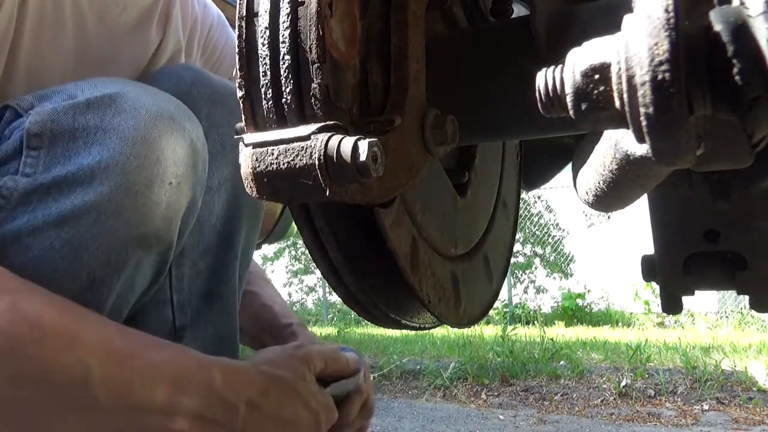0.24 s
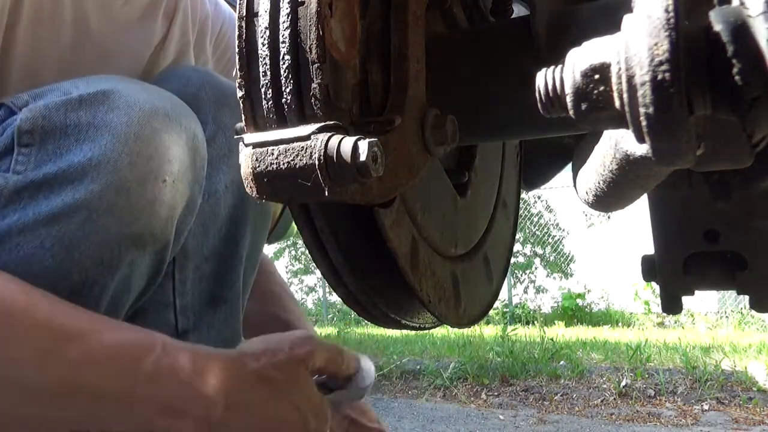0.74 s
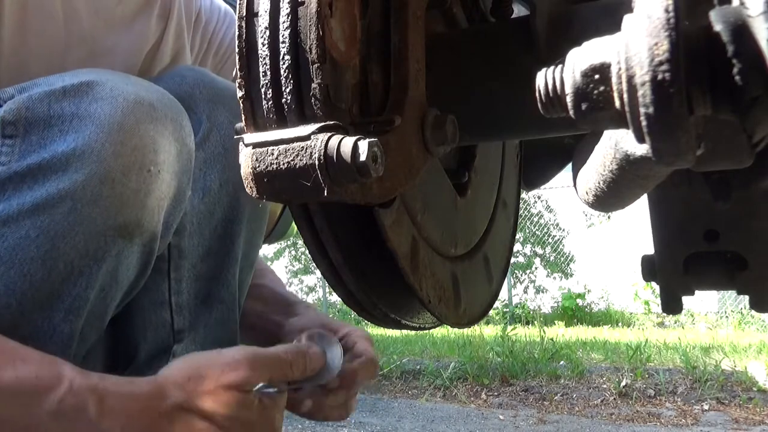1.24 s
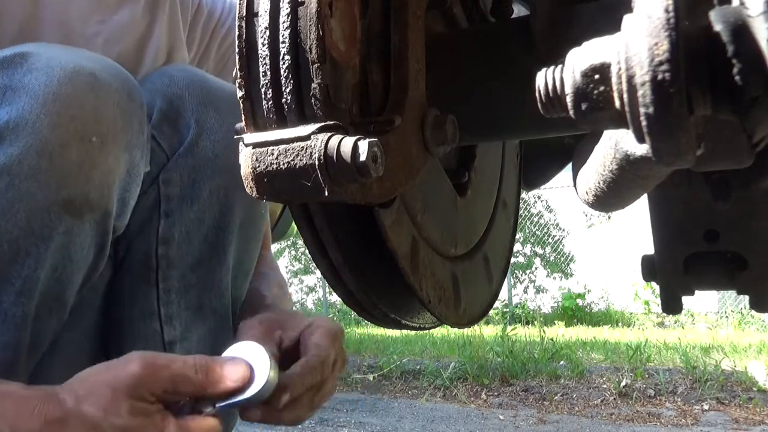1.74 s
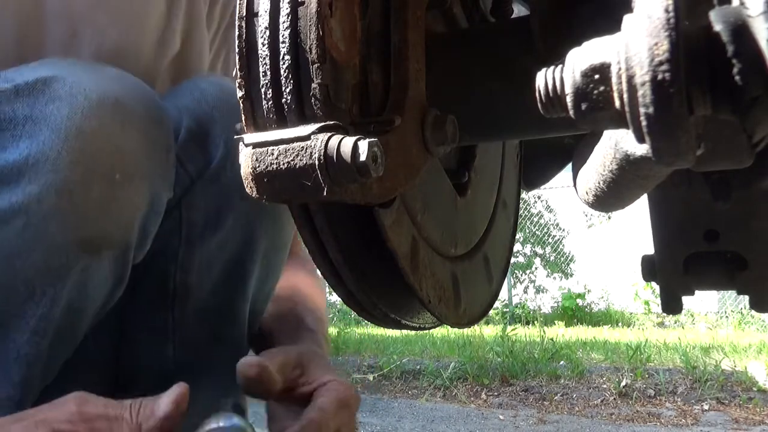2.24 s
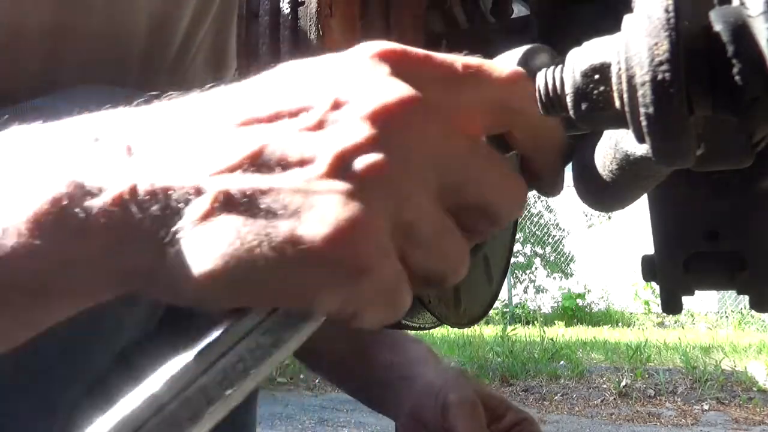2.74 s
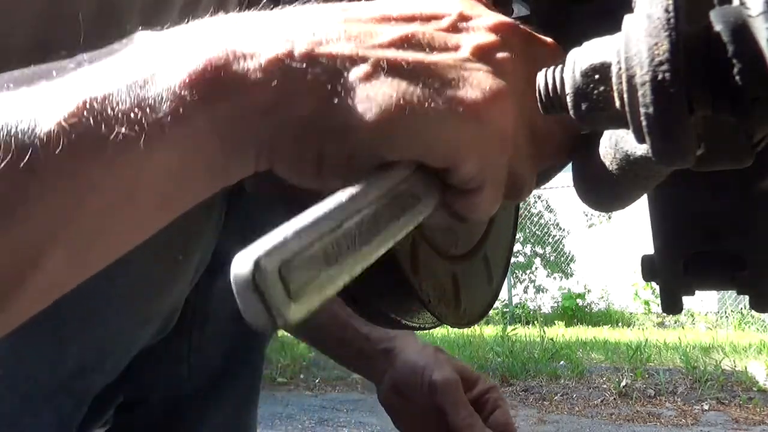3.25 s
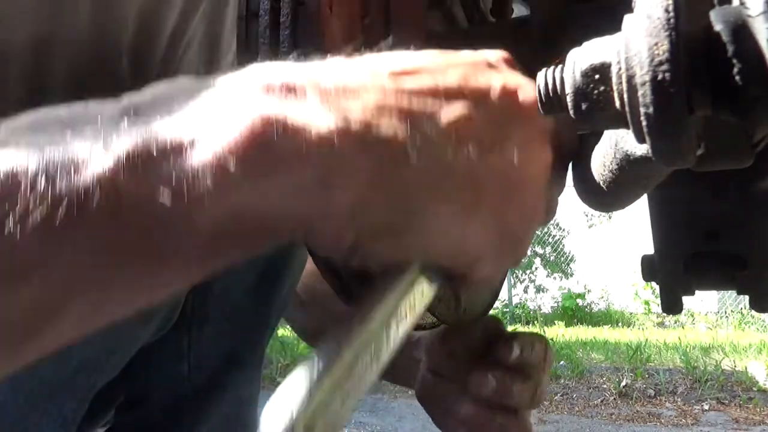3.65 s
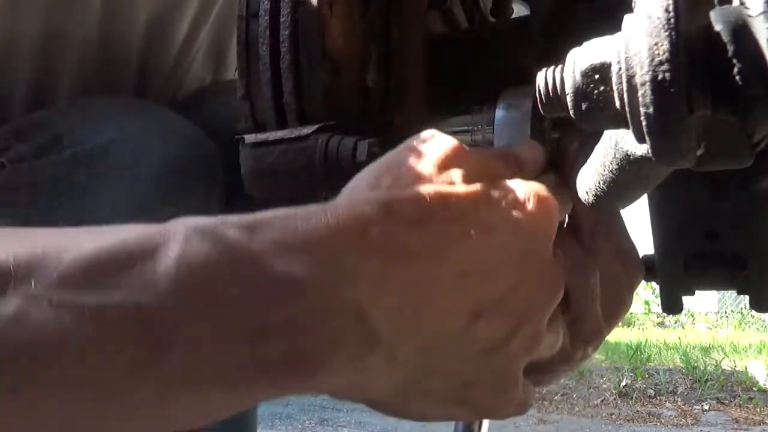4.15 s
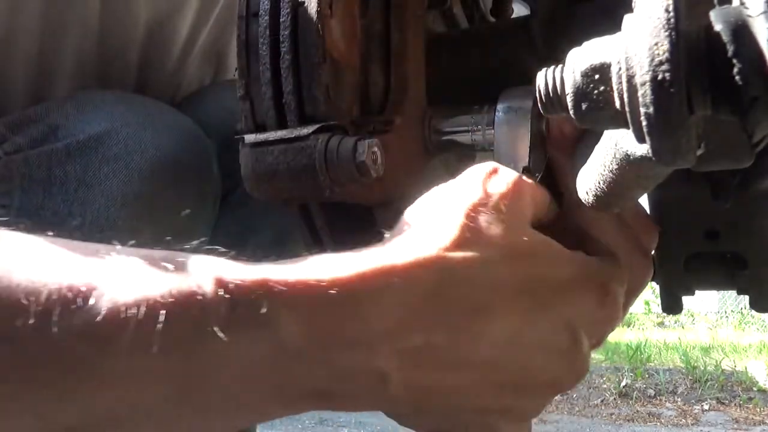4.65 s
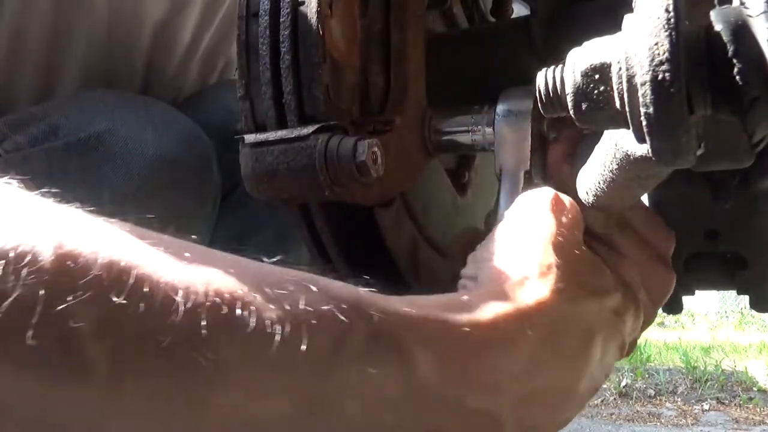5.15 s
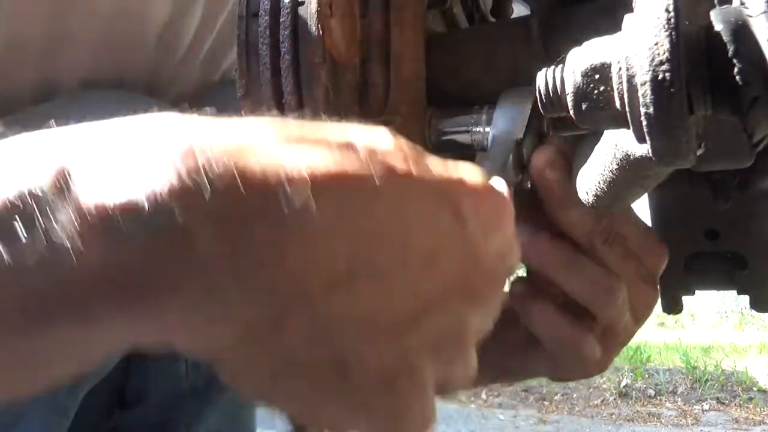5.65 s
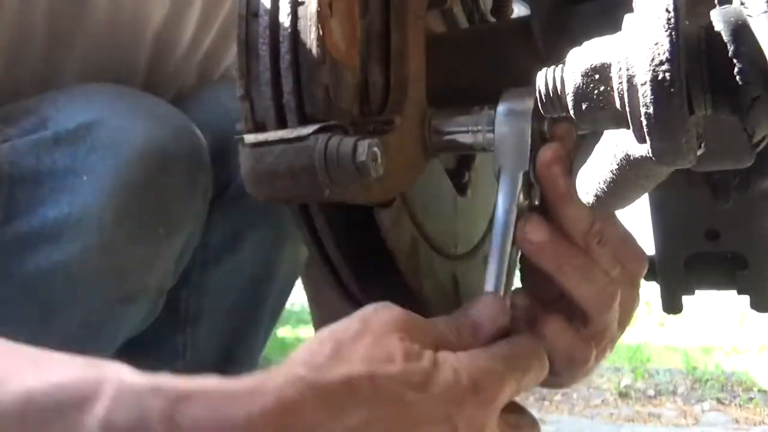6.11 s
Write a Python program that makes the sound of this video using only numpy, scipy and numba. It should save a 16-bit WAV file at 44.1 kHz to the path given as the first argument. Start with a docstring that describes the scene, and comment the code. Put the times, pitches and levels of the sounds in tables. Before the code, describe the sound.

Metal hand tools clink, thud and rattle as a ratchet is fitted and swung outdoors, with soft traffic humming behind.

```python
"""Soft traffic and a distant six-cylinder engine pulling away run throughout; hands and cloth rustle.
A steel socket rings faintly, then it and a ratchet knock and drag on concrete as they are picked up
(0.9-1.9 s) and clicked together. One bird whistles three falling calls (1.6-2.2 s), a second a lower
phrase (2.3-3.2 s). The socket seats on a hub bolt with clinks and dull thuds (3.2-3.9 s); the ratchet
is swung, teeth and loose parts rattling (5.5-6.2 s). A limiter ducks the loudest blows."""
import sys
import numpy as np
from scipy import signal
from scipy.fft import rfft, irfft, next_fast_len
from scipy.io import wavfile
from scipy.ndimage import map_coordinates
from numba import njit

SR = 44100
rng = np.random.default_rng(int(sys.argv[2]) if len(sys.argv) > 2 else 0)


def transcribe(u):
    """Save the signal u as a 16-bit wav file named by the first command-line argument.

    u: samples, shape (n,) or (channels, n), limited to [-1, 1]; the rate is SR.
    q: integer samples, one column per channel.
    """
    v = np.clip(np.atleast_2d(u).T, -1, 1)
    q = np.round(v * 32767).astype(np.int16)
    wavfile.write(sys.argv[1], SR, q)


N = 281358
T = np.arange(N) / SR
APART = np.array([[1], [-1]])  # left +, right -

# Modes of a tool lying on concrete. Each row: frequency in Hz, width in Hz, level in dB.
GROUNDED_MODES = [(1252, 200, 24), (1510, 89, 13.5), (1785, 27, 9.5), (2100, 33, 2), (2800, 350, -2.5),
                  (3830, 690, -8), (4070, 250, -2.5), (5200, 200, -30), (5830, 610, -4), (7120, 240, -0.5)]
# Modes of the ratchet. Same columns.
RATCHET_MODES = [(600, 60, -14), (950, 200, -9), (1430, 90, -10), (1720, 70, -14), (1850, 50, -14),
                 (2000, 30, -4), (2118, 38, -3), (2660, 130, -6), (3030, 100, -9), (3250, 60, -11),
                 (3470, 90, -7), (3900, 300, -10), (4300, 250, -7), (4700, 120, -10), (5110, 150, -12),
                 (5700, 400, -12), (6700, 250, -6), (7100, 350, -4), (7840, 200, -8), (8400, 300, -11),
                 (9210, 250, -11), (9690, 200, -12), (10200, 200, -13), (10900, 200, -9), (12300, 500, -22),
                 (12950, 200, -25), (14200, 600, -34)]


def undb(db):
    return 10 ** (np.asarray(db) / 20)


def level(x, rms_db):
    return x * undb(rms_db) / np.sqrt(np.mean(x ** 2))


def decay(t, t60_s):
    return np.exp(-np.log(1000) * t / t60_s)


def band(x, lo_hz, hi_hz, order=2):
    return signal.sosfilt(signal.butter(order, (lo_hz, hi_hz), "bandpass", fs=SR, output="sos"), x)


def pan(x, left_db):
    return x * undb(APART * left_db / 2)


def interp_log_hz(hz, table):
    points_hz, values = np.transpose(table)
    return np.interp(np.log(hz), np.log(points_hz), values)


def curves(table):
    """One curve over T per column after the time column."""
    times_s, *columns = np.transpose(table)
    return [np.interp(T, times_s, column) for column in columns]


def walk(rate_hz):
    """Random points joined by lines; rms about 1.5."""
    return 1.88 * map_coordinates(rng.standard_normal(int(T[-1] * rate_hz) + 2), [T * rate_hz], order=1)


def swells(rows, rise_db_s, fall_db_s):
    """Gain of bouts that rise, hold and fall, linear in dB."""
    return sum(undb(db - rise_db_s * np.maximum(s - T, 0) - fall_db_s * np.maximum(T - s - hold_s, 0))
               for s, db, hold_s in rows)


def traffic():
    """Road noise: half-octave bands flicker separately and share a swell, the treble only slightly."""
    # Each row: time in seconds, relative level in dB.
    swell = [(0.0, -42), (0.28, -41), (0.98, -37.5), (1.67, -35.5), (2.24, -35.5), (3.91, -33.5),
             (4.46, -37), (5.79, -35.5), (6.38, -38.5)]
    # Each row: frequency in Hz, relative density in dB.
    spectrum = [(25, -30), (45, -12), (145, -5), (270, -8), (363, -15.5), (463, -23.5), (560, -19),
                (850, -18.5), (1290, -21.5), (2200, -29.5), (4200, -36.5), (6500, -42.5), (11000, -49),
                (16000, -58)]
    # Each row: frequency in Hz, left-right correlation.
    correlation = [(25, 0.79), (130, 1), (300, 0.58), (600, 0.45), (2000, 0.67), (8000, 1)]
    out, swell_db = 0, curves(swell)[0]
    for hz in 30 * 2 ** np.arange(0, 9.2, .5):
        mid, side = band(rng.standard_normal((2, N)), hz / 2 ** 0.34, min(hz * 2 ** 0.34, 17000))
        alike = np.clip(interp_log_hz(hz, correlation), 0, .99)
        noise = np.sqrt(1 + alike) * mid + np.sqrt(1 - alike) * side * APART
        follow = .8 if hz < 3000 else .2
        db = interp_log_hz(hz, spectrum) + follow * (swell_db - swell_db[0]) + 0.5 * walk(7)
        out = out + pan(undb(db) * noise, -3.5 if hz < 90 else 0)
    return level(out, -32.5)


def engine(valley_db=-16):
    """Orders of the four-stroke cycle; air and echoes make each waver."""
    # Speed, dipping at a gear change. Each row: time in seconds, cycle rate in Hz.
    speed = [(0.0, 11.5), (0.25, 11.5), (0.5, 11.72), (2.55, 12.82), (2.75, 12.42), (4.1, 13.16),
             (6.38, 14.0)]
    # Swells per clear order. Each row: peak time in seconds, level in dB, hold in seconds.
    clear_orders = {6: [(0.1, -34, 0.087), (0.7, -31.5, 0.7), (2.4, -27, 0.79), (4.0, -31.5, 0.47),
                    (4.8, -35.5, 0.18), (5.7, -36.5, 0.55)], 9: [(0.6, -30, 0.16), (1.3, -28.5, 0.37),
                    (2.2, -35, 0.32), (2.8, -37.5, 0.37), (3.75, -39, 0.058), (4.7, -41, 0.18),
                    (5.4, -55, .9)], 12: [(0.0, -32, 0.075), (0.4, -33, 0.43), (1.0, -28.5, 0.25),
                    (1.6, -20, 0.13), (2.2, -24.5, 0.16), (2.8, -17.5, 0.089), (3.45, -26.5, 0.14),
                    (4.0, -32, 0.34), (4.8, -30, 0.055), (5.2, -36, 0.26), (5.8, -47.5, 0.65)],
                    15: [(0.9, -33.5, 0.48), (1.7, -24.5, 0.18), (2.35, -24, .25), (2.95, -18, 0.097),
                    (3.25, -23, 0.21), (3.85, -35, 0.27), (4.4, -33.5, 0.42), (5.2, -66, 0.042)],
                    8: [(3.9, -36, 0.37), (4.7, -33, .45)], 17: [(0.0, -34.5, 0.13), (0.5, -34, 0.91),
                    (4.3, -42, 0.13), (4.8, -36, 0.23), (5.5, -37.5, 0.11)], 23: [(0.1, -39, 0.26),
                    (0.7, -36.5, 0.14), (2.0, -41, 0.28), (4.0, -38.5, .1)], 21: [(1.0, -42.5, 0.12),
                    (1.4, -33.5, 0.68), (2.4, -38.5, 0.039), (2.8, -29.5, 0.36), (3.3, -32.5, 0.23),
                    (4.4, -40, 0.17), (5.0, -39, 0.11)]}
    # Offset in dB per weak order.
    weak_orders = {11: 0, 13: -0.9, 14: 0, 16: -1.1, 19: -25, 20: -6, 22: -26, 24: -8.5}
    # Base of the weak orders. Each row: time in seconds, level in dB.
    weak_base = [(0.0, -31), (1.4, -33), (2.0, -39), (2.5, -32), (3.4, -31), (3.8, -49), (4.4, -27),
                 (5.4, -34), (5.9, -46.5), (6.38, -50)]
    # Exhaust resonances lifting the weak orders. Each row: frequency in Hz, half-width in Hz, peak in dB.
    exhaust = [(108.4, 5.7, -5), (144.8, 1.9, -9), (198, 10.2, -3.5), (257, 6.5, -11), (289, 18.4, -7.5)]
    cycle_hz, base_db = curves(speed)[0], curves(weak_base)[0]
    order_db = {order: 20 * np.log10(swells(rows, rise_db_s=60, fall_db_s=69.5))
                for order, rows in clear_orders.items()}
    order_db[27] = order_db[21] - 9
    for order, offset_db in weak_orders.items():
        lift = sum(undb(db) / (1 + ((order * cycle_hz - hz) / width) ** 2) for hz, width, db in exhaust)
        order_db[order] = base_db + offset_db + 20 * np.log10(lift + undb(valley_db)) + 3 * walk(4)
    cycle_rad, out = 2 * np.pi * np.cumsum(cycle_hz) / SR, 0
    for order, db in order_db.items():
        drift_rad = 2 * np.pi * rng.random() + 0.26 * walk(9)
        left_lag_rad = .5 * min(order / 18, 1) + 0.24 * walk(1.835)
        tone = np.sqrt(2) * np.sin(order * cycle_rad + drift_rad - APART * left_lag_rad / 2)
        out = out + pan(undb(db) * tone, -3.2 if order < 8 else 2.)
    return out


def whistles(notes, roughness, echo_db, echo_t60_s):
    """Near-sine notes with pitch jitter, smeared by echoes from trees."""
    direct = 0
    for note in notes:
        hz, db = curves(note)
        gate = np.clip(np.minimum(T - note[0][0], note[-1][0] - T) / 0.0033, 0, 1)
        phase = 2 * np.pi * np.cumsum(hz + roughness * walk(150)) / SR
        direct = direct + gate * np.sqrt(2) * undb(db) * np.sin(phase)
    t = T[:SR // 2]
    trees = level(rng.standard_normal((2, len(t))) * decay(t, echo_t60_s), 0) / np.sqrt(len(t))
    return direct + undb(echo_db) * signal.fftconvolve(direct[None], trees)[:, :N]


def high_bird():
    """One falling whistle, three times."""
    # Each row: fraction of the call, pitch in Hz, offset in dB.
    contour = [(0, 6800, -8), (.13, 7300, 1.5), (.36, 7460, -3), (.48, 6280, 7), (.6, 5150, -4.5),
               (.85, 5110, -1), (1, 4390, -2)]
    # Each row: start in seconds, length in seconds, pitch factor, level in dB.
    calls = [(1.629, .16, 1, -49.5), (1.837, 0.18, 0.99, -45), (2.07, .165, .99, -44.5)]
    notes = [[(s + part * length_s, hz * factor, db + offset_db) for part, hz, offset_db in contour]
             for s, length_s, factor, db in calls]
    return whistles(notes, roughness=160., echo_db=3.0, echo_t60_s=0.4)


def near_bird():
    """Four gliding whistles."""
    # One list per note. Each row: time in seconds, pitch in Hz, level in dB.
    notes = [
        [(2.35, 2350, -49), (2.39, 2223, -47), (2.425, 2140, -50), (2.47, 2100, -49)],
        [(2.77, 2640, -54), (2.815, 2620, -33.5), (2.85, 2595, -55), (2.89, 2400, -38), (2.92, 2250, -52),
         (2.94, 2300, -48)],
        [(3.0, 2630, -44), (3.04, 2820, -43), (3.075, 3000, -40), (3.11, 3200, -46), (3.16, 3230, -49)],
        [(3.11, 2800, -50), (3.135, 2740, -41), (3.16, 2250, -46)],
    ]
    return whistles(notes, roughness=29.6, echo_db=1.5, echo_t60_s=0.6)


def contacts(shape, rate_hz, spread_db):
    """Sparse impulses of uneven size."""
    touches = rng.random(shape) < rate_hz / SR
    return touches * undb(spread_db * np.minimum(rng.exponential(size=shape), 3))


def rustle():
    """Skin and cloth rubbing: soft hiss with dry ticks."""
    # Each row: peak time in seconds, level in dB, hold in seconds.
    bouts = [(0, -65, .02), (.55, -55, 0.017), (1.3, -58.5, 0.52), (2.0, -50, .1), (2.45, -50.5, 0.18),
             (3.5, -52.5, 0.18), (4.3, -56.5, 0.25), (4.72, -55.5, 0.022), (5.15, -48.5, 0.023),
             (5.5, -48, 0.012), (5.85, -50, 0.18), (6.17, -47, 0.071)]
    ticks = contacts(N, rate_hz=90, spread_db=3.5) * np.sign(rng.random(N) - .5)
    hiss = rng.standard_normal(N) + 0.067 * rng.standard_normal((2, N))
    rub = level(hiss, 0) * undb(2.5 * walk(25)) + level(ticks, -6)
    return level(band(rub, 5800, 9950), 0) * swells(bouts, rise_db_s=125, fall_db_s=128)


def socket_ring():
    """The free socket rings thinly after a tap."""
    # Each row: start in seconds, frequency in Hz, level in dB, t60 in seconds.
    partials = [(0, 7900, -60, 1.1), (0, 9475, -55, .55), (0, 11100, -68, 1.7), (0, 13610, -69, 1.9),
                (.907, 8900, -59, 0.79)]
    return sum((T >= s) * undb(db) * decay(T - s, t60_s) * np.sin(2 * np.pi * hz * T)
               for s, hz, db, t60_s in partials)


def ringing(modes, click_db, scatter_db):
    """Impulse response of a part: a broad click and damped modes, slightly different per strike."""
    hz, width_hz, db = (column[:, None] for column in np.transpose(modes))
    t = T[:SR // 8]
    detune, phase, scatter = rng.standard_normal((3, len(modes), 1))
    tones = np.sin(2 * np.pi * hz * (1 + 0.0045 * detune) * t + np.pi * phase)
    gains = undb(db + scatter_db * scatter) * np.sqrt(np.abs(width_hz) / SR)
    ring = np.sum(gains * np.exp(-np.pi * np.abs(width_hz) * t) * tones, axis=0)
    ring[0] += undb(click_db)
    return ring


def scrape(modes, rate_hz, spread_db, click_db, band_hz):
    """Dense micro-contacts excite the modes; unit rms."""
    grit = contacts((2, N), rate_hz, spread_db) * rng.standard_normal((2, N))
    rung = signal.fftconvolve(grit, ringing(modes, click_db, 0)[None])[:, :N]
    mid, side = band(rung, *band_hz)
    return level(mid + 0.22 * side * APART, 0)


def concrete_drag():
    """A tool scrapes over concrete."""
    # Each row: peak time in seconds, level in dB, hold in seconds.
    bouts = [(1.11, -44, 0.0044), (1.24, -60, .06), (1.36, -35, .005), (1.53, -49, 0.0083),
             (1.6, -46, 0.083), (1.77, -32.5, .004), (1.85, -40.5, 0.0056)]
    grind = scrape(GROUNDED_MODES, rate_hz=1500, spread_db=10, click_db=8, band_hz=(990, 3000))
    return grind * swells(bouts, rise_db_s=252, fall_db_s=353)


def steel_chatter():
    """Loose steel parts rattle through the ratchet's modes."""
    # Each row: peak time in seconds, level in dB, hold in seconds.
    bouts = [(3.19, -44, 0.0058), (3.39, -31, 0.0055), (3.6, -41.5, 0.22), (3.9, -35.5, 0.0032),
             (5.62, -31.5, 0.015), (5.72, -45, 0.031), (5.8, -30.5, 0.0044), (5.92, -51, 0.057),
             (6.06, -21.5, 0.05)]
    rattle = scrape(RATCHET_MODES, rate_hz=1200, spread_db=-8, click_db=-7, band_hz=(1480, 4500))
    return rattle * swells(bouts, rise_db_s=285, fall_db_s=322)


def hub_thuds(attack_s=0.0018):
    """The socket seats; the heavy hub carries dull, damped knocks."""
    # Each row: start in seconds, level in dB, pitch in Hz, t60 in seconds.
    thuds = [(3.179, -31, 354, 0.042), (3.372, -15.5, 349, 0.067), (3.402, -25, 352, 0.14),
             (3.618, -19.5, 363, 0.057), (3.906, -25, 357, 0.12)]
    # Each row: pitch ratio, relative level in dB.
    overtones = [(1.7, -10), (2.6, -17), (3.9, -12)]
    out = np.zeros(N)
    for s, db, hz, t60_s in thuds:
        t = np.maximum(T - s, 0)
        phase = 2 * np.pi * hz * t
        tone = np.sin(phase) + sum(undb(over_db) * np.sin(ratio * phase) for ratio, over_db in overtones)
        out += undb(db) * np.minimum(t / attack_s, 1) * decay(t, t60_s) * tone
    return out


def blows(events, modes, colour, crack_db, crack_s, click_db, scatter_db, width):
    """Per blow, a sharp crack and a dying rattle excite the modes, weighted in five bands."""
    # Each row: low edge in Hz, high edge in Hz.
    bands_hz = ((2300, 5500), (500, 1800), (1800, 2300), (5500, 9400), (9400, 15500))
    t60_factors = (1.04, 1.62, 0.91, 0.74, 0.57)  # per band; treble dies first
    out, t = np.zeros((2, N + SR)), T[:SR // 6]
    size = next_fast_len(2 * len(t))
    filters = [rfft(band(t == 0, *edges, order=3), size) for edges in bands_hz]
    for s, level_db, bright_db, tone_db, t60_s in events:
        band_db = level_db + np.array(colour) @ (1, bright_db, tone_db)
        ring = rfft(ringing(modes, click_db, scatter_db), size)
        rebounds = np.repeat(undb(2.0 * rng.standard_normal(len(t) // 70 + 1)), 70)[:len(t)]
        noise = rebounds * rng.standard_normal((2, len(t)))
        left_db, start = 2.4 * rng.standard_normal() - .6, int(s * SR)
        for db, bandpass, factor in zip(band_db, filters, t60_factors):
            force = noise * (decay(t, t60_s * factor) + undb(crack_db) * np.exp(-t / crack_s))
            mid, side = irfft(rfft(force, size) * ring * bandpass, size)[:, :len(t)]
            pair = mid + width * side * APART  # echoes off wheel and ground differ left and right
            out[:, start:start + len(t)] += pan(pair, left_db) * undb(db) / np.abs(mid).max()
    return out[:, :N]


def concrete_knocks():
    """The tools knock on concrete."""
    # Each row: start in seconds, level in dB, brightness in dB, low tone in dB, base t60 in seconds.
    knocks = [(0.9066, -5, -17, -10, 0.075), (0.9638, -26, -7, 0, 0.045), (1.0087, -30, -24, -3, 0.051),
              (1.0183, -8.5, -38, -5, 0.072), (1.059, -26, -15, -15, 0.087),
              (1.0774, -24.5, -25, 7.5, 0.056), (1.098, -33.5, -22, 8, 0.042), (1.2212, -13, -4, -2, .084),
              (1.2692, -32.5, -9, 13.5, .08), (1.2845, -15.5, -6.5, -7, 0.08),
              (1.3068, -20.5, -24, 3.5, 0.034), (1.3327, -37, -13, 17, 0.16), (1.3548, -32.5, -21, 8, 0.15),
              (1.4076, -17.5, -1.5, -22, .086), (1.4479, -22, -19, -33, 0.11), (1.508, -29, -13, 4, 0.22),
              (1.7842, -30, -5.5, 3.5, .12)]
    # One row per band: offset in dB, dB per dB of brightness, dB per dB of low tone.
    colour = [(1, 0, 0), (-0.5, 0, 1), (-3, 0.7, 1.15), (6, 2, 0.5), (-27, 2, 2)]
    return blows(knocks, GROUNDED_MODES, colour,
                 crack_db=0.5, crack_s=0.0019, click_db=-11, scatter_db=-1, width=0.26)


def steel_clinks():
    """Steel strikes steel, ratchet teeth included."""
    # Each row: start in seconds, level in dB, brightness in dB, handle tone in dB, base t60 in seconds.
    clinks = [(0.1053, -45, 5, -8, .05), (0.181, -38, 5.5, -3, 0.064), (0.2444, -53, 11, -3, .06),
              (0.257, -37.5, -11, -12, 0.044), (0.3934, -51, 12, -5, .05), (0.484, -29, -9, -15, 0.096),
              (0.4947, -25, -3, -15, 0.085), (0.7063, -31, 7, -14, 0.028), (1.247, -40, 11, -10, .06),
              (1.5485, -13, 2, -15, 0.079), (1.6796, -30, -7, -4.5, 0.069), (1.7337, -13, 7.5, -33, 0.09),
              (1.894, -23, -5, -14, 0.057), (1.9019, -17, 6.5, -13, 0.089), (1.9265, -11, 10.5, -4.5, 0.19),
              (2.1114, -36.5, 9.5, -8, .065), (2.2388, -26.5, 7, -4, 0.015), (2.317, -31, -7, -12, .09),
              (2.542, -37, 10, -12, 0.041), (2.5964, -42.5, 12, -5, .053), (2.7267, -36.5, 3.5, -13, .073),
              (3.1773, -3.5, -8, -4, 0.11), (3.3717, -14.5, -4, -15, 0.12), (3.3994, -13, 0, -13, .1),
              (3.4035, -4.5, -6, -2, 0.18), (3.5828, -25, -7, -4.5, 0.036), (3.638, -35, -1, 6, 0.15),
              (3.6661, -17, 10.5, -15, 0.13), (3.6894, -19, -3, -8, 0.19), (3.7085, -18, 13.5, -5.5, 0.14),
              (3.7555, -8, 2.5, -16, 0.095), (3.8483, -21, -7.5, -19, 0.075), (3.904, -4, -5, -9, 0.14),
              (4.0655, -31, -6, -7, 0.077), (4.0973, -30, 5, 1, .13), (4.1343, -12.5, 3.5, -28, 0.14),
              (4.1825, -13, 4.5, -19, 0.11), (4.5002, -27.5, 7.5, -11, 0.088),
              (4.9353, -10, 2.5, -41, 0.098), (5.089, -36, 1.5, 0, 0.15), (5.231, -20, 4, -12.5, 0.076),
              (5.5412, -25, -8, -4.5, 0.058), (5.5917, -28, -8, 2.5, 0.12), (5.6048, -24, -4.5, -2, 0.051),
              (5.6479, -21, -3, -6, 0.044), (5.6615, -19.5, -13, -1.5, 0.051),
              (5.666, -19.5, -10, -5, 0.068), (5.6905, -22.5, -6, -3, 0.11), (5.7318, -19, -8.5, -8, .09),
              (5.7735, -16.5, 6.5, -18, 0.047), (5.778, -11, 4, -7, 0.049), (5.8207, -18.5, -5, -4.5, .076),
              (5.8488, -42, 9, 14, .04), (5.885, -12.5, 5.5, -25, 0.061), (5.964, -16, 11, -10, 0.093),
              (6.0001, -14, 8, -5.5, .082), (6.0264, -14, 9, 0, 0.19), (6.0494, -9, 4, -13, 0.048),
              (6.0711, -16.5, 11, 3, 0.15), (6.0935, -9.5, 1, -15, 0.12), (6.122, -13, 6.5, -27, .07),
              (6.163, -11, 4.5, -28, .09), (6.2956, -31, -18, -3.5, .04)]
    # One row per band: offset in dB, dB per dB of brightness, dB per dB of handle tone.
    colour = [(0, -0.085, 0.014), (-16, -0.81, 0), (0.5, -0.082, 0.85), (1, 0.71, 0.037), (-13.5, 1.45, 0)]
    return blows(clinks, RATCHET_MODES, colour,
                 crack_db=6, crack_s=0.001, click_db=-29, scatter_db=1, width=0.19)


def scene():
    tools = concrete_knocks() + steel_clinks() + hub_thuds()
    tools += concrete_drag() + steel_chatter() + socket_ring()
    return tools + near_bird() + high_bird() + engine() + rustle() + traffic()


@njit
def follower(x, attack, release):
    """Peak envelope; coefficients per sample."""
    peak, out = 0., np.empty(len(x))
    for i in range(len(x)):
        peak += (x[i] - peak) * (attack if x[i] > peak else release)
        out[i] = peak
    return out


def record(dry, threshold_db=-9, attack_s=0.00025, release_s=0.0038, cutoff_hz=16200):
    """A limiter ducks everything under the loudest blows; soft clip and steep low-pass follow."""
    peak = follower(np.abs(dry).max(axis=0), 1 / (attack_s * SR), 1 / (release_s * SR))
    limited = dry * np.minimum(1, undb(threshold_db) / (peak + 1e-9))
    clipped = 0.81 * np.tanh(limited / 0.81)
    return signal.sosfilt(signal.ellip(12, .2, 90, cutoff_hz, fs=SR, output="sos"), clipped)


dry = scene()
out = record(dry)
transcribe(out)
```